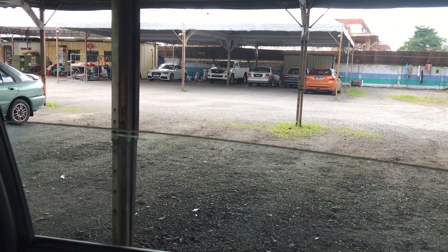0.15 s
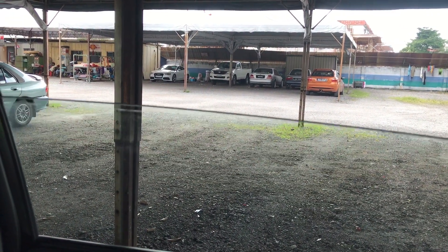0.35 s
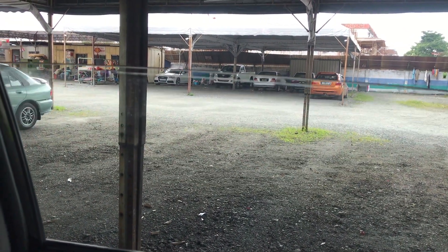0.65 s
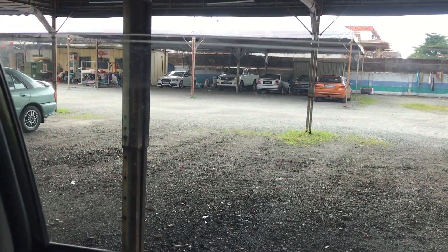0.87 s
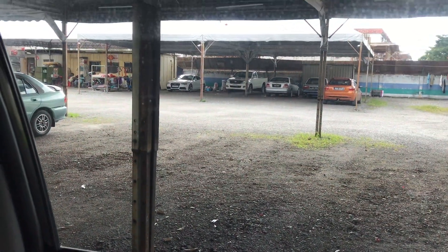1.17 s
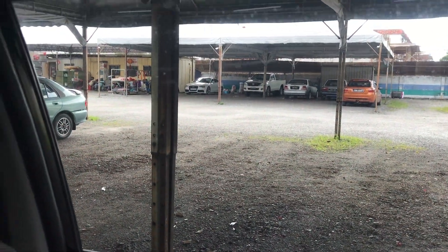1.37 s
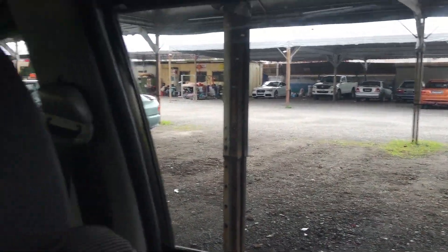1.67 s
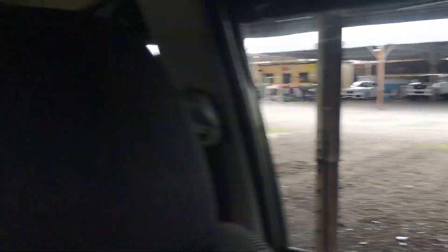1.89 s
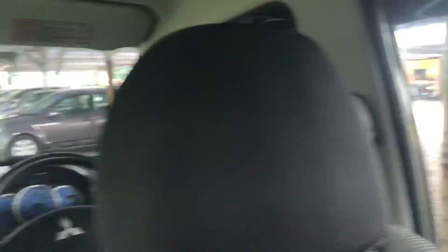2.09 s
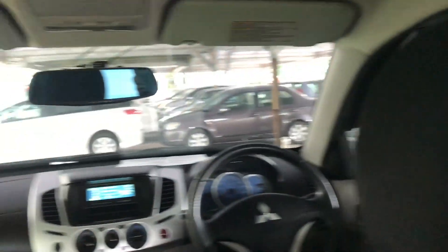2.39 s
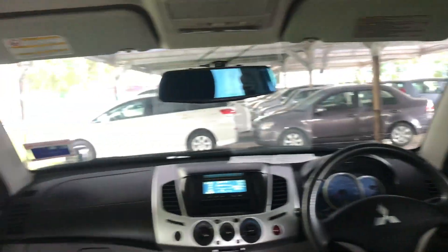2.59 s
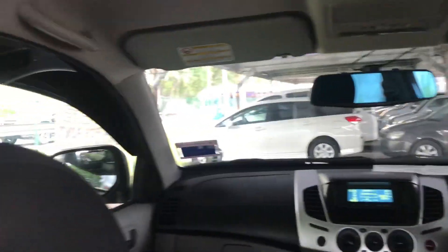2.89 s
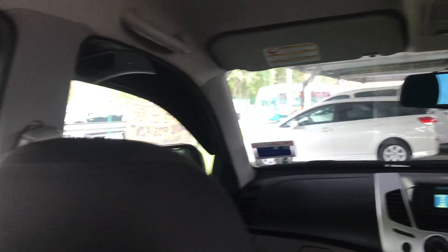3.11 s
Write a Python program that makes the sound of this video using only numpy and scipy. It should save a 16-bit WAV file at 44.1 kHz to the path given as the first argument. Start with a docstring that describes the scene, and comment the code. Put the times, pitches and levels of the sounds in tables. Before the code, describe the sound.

A power window motor whines inside a parked car, rising in pitch as glass hisses along its seals; it thumps shut with small snaps, leaving low engine idle, then close clicks and knocks on the camera.

```python
"""A power window rises in a parked car: its motor whirs, a sum of shaft orders that sag and then speed up.
The glass hisses along its seals (noise of shifting colour), over an idling engine (firing orders),
steady cabin noise and a yard rumble that ends as the window shuts. The glass thumps into the frame
(ringing door modes) and seal and switch snap (noise bursts). Last come handling clicks (impulses),
knocks (ringing case modes) and brief rubs (grainy noise) on a camera body close to the microphone."""
import sys
import numpy as np
from scipy import signal
from scipy.fft import rfft, irfft
from scipy.io import wavfile
from scipy.ndimage import uniform_filter1d

SR = 44100
rng = np.random.default_rng(int(sys.argv[2]) if len(sys.argv) > 2 else 0)


def to_wav(sig):
    """Store sig (one row per channel, or 1-D mono) as 16-bit WAV at the path in sys.argv[1].

    Samples outside -1..1 are clipped; the rate is SR.
    """
    pcm = np.clip(np.atleast_2d(sig), -1, 1) * 32767
    pcm = np.round(pcm).astype(np.int16)
    wavfile.write(sys.argv[1], SR, pcm.T)  # frames by channels


N = 143325
T = np.arange(N) / SR


def amp(db):
    """Decibels to gain."""
    return 10 ** (np.asarray(db) / 20)


def unit(x):
    """Scales to rms 1."""
    return x / np.sqrt(np.mean(x ** 2) + 1e-20)


def curve(points):
    """A table of (time [s], value) at every sample."""
    return np.interp(T, *np.transpose(points))


def colour(points, hz, tilt_db=0):
    """A spectrum in dB on a log-frequency axis, tilted about 2 kHz; the tilt is held below 500 Hz."""
    f, db = np.transpose(points)
    tilt = tilt_db * np.log2(np.maximum(hz, 500) / 2000)
    return np.interp(np.log(hz + 1), np.log(f), db) + tilt


def noise(points, tilt_db=0, size=N):
    """Noise of a given spectrum, rms 1."""
    gain = amp(colour(points, np.fft.rfftfreq(size, 1 / SR), tilt_db))
    return unit(irfft(rfft(rng.standard_normal(size)) * gain, size))


def drift(rate_hz, size=N):
    """Slow random motion, rms 1."""
    hz = np.fft.rfftfreq(size, 1 / SR)
    gain = (hz > 0) / (1 + (hz / rate_hz) ** 4)
    return unit(irfft(rfft(rng.standard_normal(size)) * gain, size))


def order_tone(order, turns, db):
    """A sine at a multiple of a rotation, from a random phase, with its rms level in dB."""
    phase = order * turns + rng.random()
    return np.sqrt(2) * amp(db) * np.sin(2 * np.pi * phase)


def add(mix, s, sound):
    """Mixes a sound in at a time."""
    part = mix[round(s * SR):][:len(sound)]
    part += sound[:len(part)]


STOP_S, RUN_DOWN_S = 1.793, 0.011  # the window shuts; time constant of the dying away


def running():
    """1 while the window moves, dying away exponentially once it is shut."""
    return np.exp(-np.maximum(T - STOP_S, 0) / RUN_DOWN_S)


# motor shaft: (time [s], mean speed [turns per second])
MOTOR_SPEED = [(0, 101.3), (.1, 98), (.25, 95), (.48, 98.3), (.59, 96.7), (.75, 101), (1.0, 110),
               (1.1, 113.5), (1.3, 118.5), (1.5, 122.6), (1.78, 125)]
# weaker, steady orders of the shaft: (multiple of the speed, level [dB])
STEADY_ORDERS = [(3, -70), (4, -68), (6, -74), (10, -74)]
# strong orders, which change with the load: (multiple of the speed)
LOADED_ORDERS = [1, 2, 7, 8, 9]
# their changing levels: (time [s], one level [dB] for each of LOADED_ORDERS)
LOADED_LEVELS = [(0, -51, -60, -68, -63, -60), (.15, -53, -54, -66, -57, -69),
                 (.33, -54, -57, -68, -56.5, -71), (.44, -53, -60, -69, -62, -61),
                 (.56, -52, -58, -63, -56.5, -60), (.67, -53, -58, -60, -53, -69),
                 (.77, -53, -57, -61, -64, -68), (.86, -52, -59, -66, -76, -69),
                 (.99, -47, -56, -62, -72, -71), (1.1, -45, -54, -78, -58, -78),
                 (1.26, -47, -51, -74, -57, -74), (1.53, -47, -52, -73, -52.5, -78),
                 (1.66, -45, -54, -69, -59, -78), (1.78, -45, -55, -70, -60, -78)]
# resonances of the motor housing, lifting the buzz: (frequency [Hz], width [Hz], lift [dB])
HOUSING_MODES = [(1720, 160, 10), (2270, 170, 11)]
BUZZ_DB = -80  # each higher order before the housing lifts it
MOTOR_WOBBLE, MOTOR_FLUTTER_DB = .0015, 1  # rms: fraction of the speed; level


def motor():
    """The motor sings on the orders of its shaft speed; the eighth is the whine, brushes buzz above."""
    speed = curve(MOTOR_SPEED) * (1 + MOTOR_WOBBLE * drift(rate_hz=24.5))
    turns = np.cumsum(speed) / SR
    times, *levels = np.transpose(LOADED_LEVELS)
    orders = list(STEADY_ORDERS)
    for order, db in zip(LOADED_ORDERS, levels):
        orders.append((order, np.interp(T, times, db)))
    for order in range(13, 26):
        # a buzz order swells as it sweeps through a housing resonance
        lift = sum(lift_db / (1 + (2 * (order * speed - hz) / width) ** 2)
                   for hz, width, lift_db in HOUSING_MODES)
        orders.append((order, BUZZ_DB + lift))
    flutter = amp(MOTOR_FLUTTER_DB * drift(rate_hz=15))
    return sum(order_tone(order, turns, db) for order, db in orders) * flutter * running()


# hiss of the glass early, midway and late in its travel: (frequency [Hz], level per Hz [dB])
EARLY_HISS = [(250, 2), (380, 2), (550, -1), (740, 1), (900, 1), (1200, 1), (1560, -2), (1720, 1),
              (1980, -5), (2320, 0), (2600, -6), (3100, -9.5), (4300, -9), (8400, -12), (10500, -19),
              (11500, -15), (13500, -13), (15800, -15)]
MID_HISS = [(250, 4), (450, 1), (700, -2), (830, -3), (960, 1), (1200, -2.5), (1500, -6), (1720, -2),
            (2000, -5), (2220, -4), (2500, -8), (3150, -7.5), (4600, -6), (6000, -8), (9000, -13),
            (10500, -18.5), (11500, -11.5), (15800, -11.5)]
LATE_HISS = [(250, -1), (560, -5), (900, -1.5), (1100, -3), (1350, -2), (1500, -5), (2050, -4), (2260, 3),
             (2500, -3), (3050, -6), (4500, -2), (5500, -10.5), (9000, -9), (10400, -14.5), (11700, -10.5),
             (15800, -11)]
# when each of the three colours is reached: (time [s])
HISS_TIMES = [0.32, 1.08, 1.7]
# loudness of the sliding: (time [s], mean level [dB])
SLIDE_LEVEL = [(0, -46), (.45, -47), (.9, -48), (1.4, -48), (1.62, -47), (1.72, -45.5), (1.79, -48),
               (1.802, -54), (1.842, -56), (1.865, -82), (1.95, -100)]
SLIDE_FLICKER_DB, SLIDE_PATCH_DB = .5, 1.4  # rms: overall level; patches of time and pitch


def slide():
    """Friction of glass on the seals: a hiss whose colour shifts as the pane rises."""
    hz, t, z = signal.stft(rng.standard_normal(N), SR, nperseg=1024, noverlap=768)
    db = 0
    for spectrum, turn in zip((EARLY_HISS, MID_HISS, LATE_HISS), np.eye(3)):
        weight = np.interp(t, HISS_TIMES, turn)
        db = db + np.outer(colour(spectrum, hz), weight)
    gain = amp(db) / np.sqrt(np.mean(amp(db) ** 2, 0))  # equal power in every frame
    patches = uniform_filter1d(rng.standard_normal(z.shape), size=7, axis=0)
    patches = unit(uniform_filter1d(patches, size=12, axis=1))
    frames = z * gain * amp(SLIDE_PATCH_DB * patches)
    hiss = signal.istft(frames, SR, nperseg=1024, noverlap=768)[1][:N]
    return unit(hiss) * amp(curve(SLIDE_LEVEL) + SLIDE_FLICKER_DB * drift(rate_hz=60))


# engine idle: (multiple of the firing rate, mean level [dB])
FIRING_ORDERS = [(1, -62), (2, -49), (4, -48.5), (5, -53.5), (6, -57), (7, -59), (8, -61), (9, -62),
                 (10, -63), (11, -63), (12, -64.5)]
# boom on the third order, swelling as the cabin is sealed: (time [s], mean level [dB])
BOOM_LEVEL = [(0, -42), (1.8, -43), (1.87, -36), (1.93, -32.5), (1.96, -40), (2.1, -39), (2.65, -40.5),
              (2.9, -39), (3.08, -44), (3.2, -38)]
FIRING_HZ = 23.38  # mean
IDLE_WOBBLE, IDLE_FLUTTER_DB = .012, 2  # rms: fraction of the rate; level of each order


def idle():
    """The engine's firing orders boom in the cabin, each with its own unsteady level."""
    rate = FIRING_HZ * (1 + IDLE_WOBBLE * drift(rate_hz=5.03))
    turns = np.cumsum(rate) / SR
    orders = FIRING_ORDERS + [(3, curve(BOOM_LEVEL))]
    return sum(order_tone(order, turns, db + IDLE_FLUTTER_DB * drift(rate_hz=4.6))
               for order, db in orders)


# steady rumble and hiss of the cabin: (frequency [Hz], relative level per Hz [dB])
CABIN_COLOUR = [(20, -6), (45, -3), (120, -3), (200, -10), (300, -12.5), (450, -23), (700, -24), (900, -26),
                (1400, -27), (2200, -36), (3200, -41), (4800, -44), (6000, -39.5), (8500, -41),
                (10500, -45.5), (12000, -42.5), (15800, -44)]
CABIN_DB = -50


def cabin():
    """The steady noise floor of the cabin."""
    return amp(CABIN_DB) * noise(CABIN_COLOUR)


# rumble of the yard: (frequency [Hz], relative level per Hz [dB])
YARD_COLOUR = [(20, -1), (45, 7), (120, -4), (200, -7), (300, -13), (600, -36), (2000, -70)]
# its level as the window gap narrows: (time [s], level [dB])
YARD_LEVEL = [(0, -40), (.18, -45), (.9, -46.5), (1.4, -49), (1.78, -48)]


def yard():
    """Outdoor rumble through the open window, cut off when it shuts."""
    return amp(curve(YARD_LEVEL)) * noise(YARD_COLOUR) * running()


def blow(modes, db, contact_s):
    """A soft push rings the modes of a body; longer contact is duller."""
    t = np.arange(SR) / SR
    push = t * np.exp(-4 * t / contact_s)
    ring = 0
    for k, (hz, level, t60) in enumerate(modes):
        sign = (-1) ** k  # neighbouring modes start in opposite directions
        ring = ring + sign * amp(level - 60 * t / t60) * np.sin(2 * np.pi * hz * t)
    return amp(db) * signal.fftconvolve(ring, push / push.sum())[:len(t)]


# glass meeting the frame and rebounding, then a later dull blow: (time [s], blow level [dB], contact time [s])
DOOR_THUMPS = [(1.7345, -25, .0048), (1.7863, -20.4, .0006), (1.795, -6, .0175), (1.8137, -12.5, .007),
               (1.8414, -14, .0126)]
# modes of the door: (frequency [Hz], relative level [dB], T60 [s])
DOOR_MODES = [(69, -18, .8), (87, -3, .5), (140, 5, .13), (186, -1.6, .42), (263, 2.4, .17),
              (303, -6.6, .22), (346, 5.6, .04), (451, -20, .18), (590, -17, .16), (710, -13, .11)]


def thumps(mix):
    """The pane strikes the frame, and a later dull blow follows; each rings the door."""
    for s, db, contact_s in DOOR_THUMPS:
        add(mix, s, blow(DOOR_MODES, db, contact_s))


# snaps of the seal, the switch and the handled camera case:
# (time [s], level [dB], T60 [s], treble tilt [dB per octave], main ring [Hz])
TRIM_SNAPS = [(1.737, -37, .06, 0.5, 1900), (1.742, -35, 0.046, 1, 2500), (1.7857, -37, 0.065, -3, 1300),
              (1.8955, -40, .025, 5, 3600), (1.899, -44, .08, -10, 1720), (1.910, -29.5, .036, 0, 2380),
              (1.914, -42, .06, -6, 1100), (1.948, -42, .045, -5, 1000), (1.965, -41.5, .05, -4, 1000),
              (1.970, -51, .09, 6, 1750), (1.979, -51, 0.088, -8.5, 950), (2.003, -51, 0.048, 0, 1800),
              (3.0548, -19, .011, 5, 6100)]
# dense modes of plastic trim: (frequency [Hz], relative level per Hz [dB])
TRIM_COLOUR = [(200, -11), (650, -8.5), (1000, -0.5), (1350, -3.5), (1800, -1), (2400, 3.5), (3200, -10.5),
               (4300, -10.5), (5200, -15), (7000, -15), (10500, -22), (12000, -19), (16000, -20)]
SNAP_RISE_S, SNAP_RING_DB, SNAP_RING_WIDTH_HZ = .0006, 9, 260


def snap(db, t60, tilt_db, ring_hz):
    """A short burst from the dense modes of plastic trim, one band of it ringing louder."""
    t = np.arange(SR // 5) / SR
    burst = noise(TRIM_COLOUR, tilt_db, size=len(t))
    b, a = signal.iirpeak(ring_hz, ring_hz / SNAP_RING_WIDTH_HZ, fs=SR)
    ring = signal.lfilter(b, a, burst)
    rise = 1 - np.exp(-t / SNAP_RISE_S)
    decay = np.exp(-np.log(1000) * t / t60)
    return amp(db) * rise * decay * unit(burst + amp(SNAP_RING_DB) * ring)


# dry handling clicks: (time [s], peak level [dB], treble tilt [dB per octave])
HANDLING_CLICKS = [(2.5389, -15, -.7), (2.5598, -44, 9), (2.7608, -31.5, -2), (2.801, -39.5, -1),
                   (2.973, -31, -3), (3.0635, -24, -1), (3.074, -26, 5), (3.079, -22, -0.5)]
# colour of the camera body: (frequency [Hz], relative level [dB])
BODY_COLOUR = [(60, -5), (250, 0), (550, 3.5), (1100, -8.5), (1700, -7), (2400, -1), (3300, -9),
               (4200, -18.5), (5000, -20), (5900, -13), (7500, -24), (9500, -22.5), (11000, -36),
               (16000, -35)]
CLICK_TAIL_DB, CLICK_T60_S = -14.5, 0.064


def click(db, tilt_db, size=4096):
    """One sharp impulse, coloured by the camera body, with a faint cabin tail."""
    hz = abs(np.fft.fftfreq(size, 1 / SR))
    log_gain = np.log(amp(colour(BODY_COLOUR, hz, tilt_db)))
    # minimum phase puts the energy right at the onset
    tick = np.fft.ifft(np.exp(np.conj(signal.hilbert(log_gain)))).real
    tail = rng.standard_normal(size) * np.exp(-np.log(1000) * np.arange(size) / SR / CLICK_T60_S)
    tail /= np.linalg.norm(tail)
    sound = tick + amp(CLICK_TAIL_DB) * signal.fftconvolve(tick, tail)[:size]
    return amp(db) * sound / abs(tick).max()


# dull knocks on the camera body: (time [s], blow level [dB], contact time [s])
BODY_KNOCKS = [(2.737, -47, .0006), (2.761, -42, .001), (2.975, -30, .0016), (3.0555, -19.5, .001)]
# modes of its case: (frequency [Hz], relative level [dB], T60 [s])
CASE_MODES = [(130, -1, .06), (272, -3, .05), (350, -6, .04), (511, 0.5, .045), (700, -6, 0.045)]


def knocks(mix):
    """Soft blows ring the few low modes of the camera case."""
    for s, db, contact_s in BODY_KNOCKS:
        add(mix, s, blow(CASE_MODES, db, contact_s))


# rubs of a hand:
# (time of the peak [s], level [dB], rise [s], fall [s], treble tilt [dB per octave])
HAND_RUBS = [(2.866, -51, .008, .014, -3), (2.893, -48, .016, .018, -4), (2.942, -50, .014, .008, -3),
             (2.972, -48, .008, 0.0062, -3)]
# their colour: (frequency [Hz], relative level per Hz [dB])
HAND_COLOUR = [(200, -2), (340, 6), (520, -4), (680, 0), (900, -8), (1300, -8.5), (1800, -12), (2300, -2),
               (2800, 2.5), (3600, -8), (5000, -16), (6500, -13), (10500, -24), (15800, -22)]
# one louder scuff right on the camera body: columns as for the rubs
BODY_SCUFF = (3.056, -27.5, .0095, .015, 0)
# its colour: (frequency [Hz], relative level per Hz [dB])
BODY_SCUFF_COLOUR = [(200, -5), (600, -1), (1000, -7), (2300, 0), (3600, -7), (4200, -4), (5000, -9),
                     (6100, 4), (7300, -8), (8700, -6), (10500, -18), (12000, -15), (15800, -13)]
GRAIN_DB, GRAIN_HZ = 3.5, 600  # rms depth and rate of the grain
LIFT_FALLS = 1.9  # the hand lifts this many fall times after the peak


def rub(spectrum, peak_s, db, rise_s, fall_s, tilt_db, size=16384):
    """Grainy friction swells, fades, and ends as the hand lifts; returns its start and sound."""
    t = (np.arange(size) - size // 2) / SR  # 0 at the peak
    swell = np.exp(np.minimum(t / rise_s, -t / fall_s))
    lift = 1 / (1 + (np.maximum(t, 0) / (LIFT_FALLS * fall_s)) ** 10)
    grains = unit(amp(GRAIN_DB * drift(GRAIN_HZ, size=size)))
    return peak_s + t[0], amp(db) * swell * lift * grains * noise(spectrum, tilt_db, size=size)


def scene():
    """The window closes over the engine and cabin, then the handling follows."""
    mix = motor() + slide() + idle() + cabin() + yard()
    thumps(mix)
    for s, *row in TRIM_SNAPS:
        add(mix, s, snap(*row))
    for s, *row in HANDLING_CLICKS:
        add(mix, s, click(*row))
    knocks(mix)
    for row in HAND_RUBS:
        add(mix, *rub(HAND_COLOUR, *row))
    add(mix, *rub(BODY_SCUFF_COLOUR, *BODY_SCUFF))
    return mix[None]


EDGE_HZ = 15900


def record(dry):
    """A steep linear-phase low-pass limits the band, with the ends padded to keep the length."""
    padded = np.pad(dry, ((0, 0), (255, 255)), "edge")
    lowpass = signal.firwin(511, EDGE_HZ, window=("kaiser", 9), fs=SR)
    return signal.oaconvolve(padded, lowpass[None], "valid")


dry = scene()
out = record(dry)
to_wav(out)
```